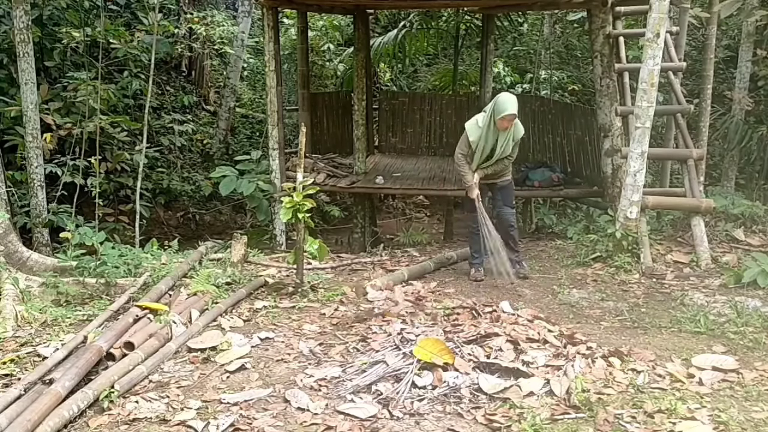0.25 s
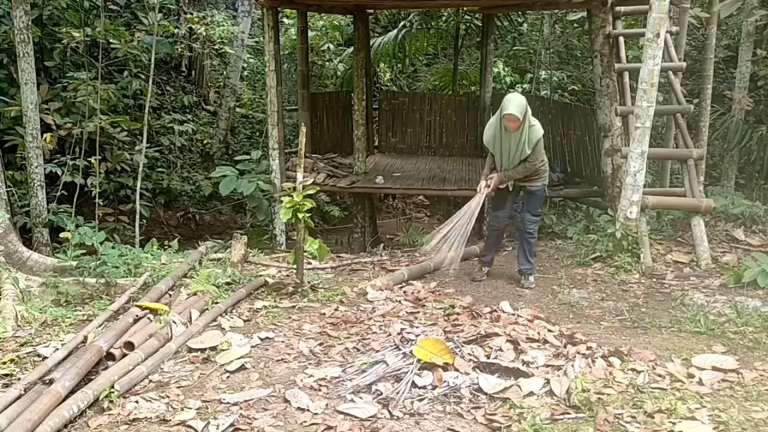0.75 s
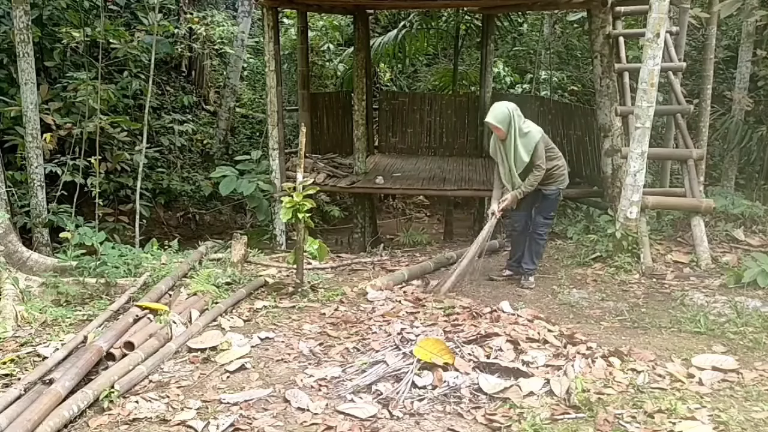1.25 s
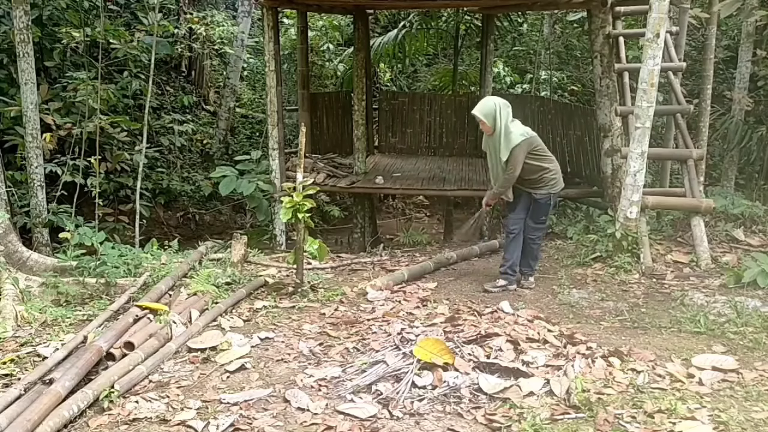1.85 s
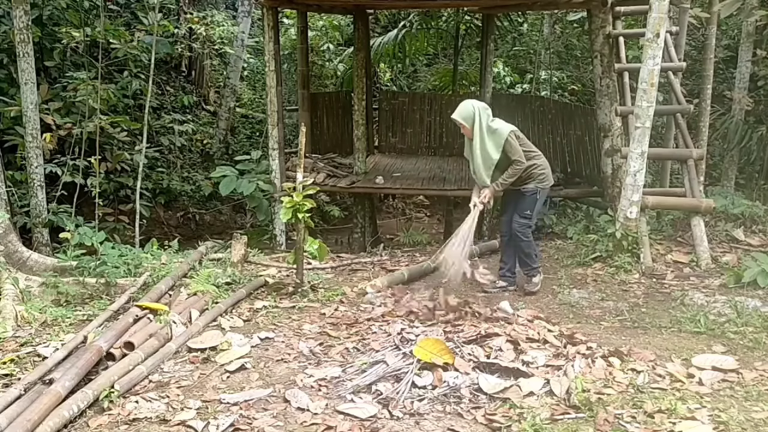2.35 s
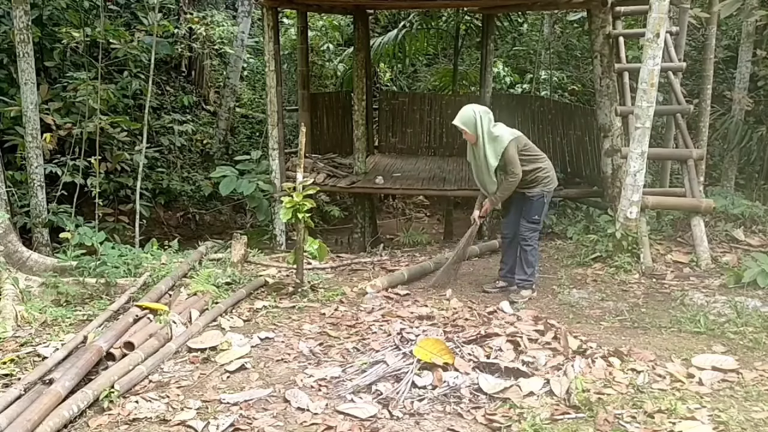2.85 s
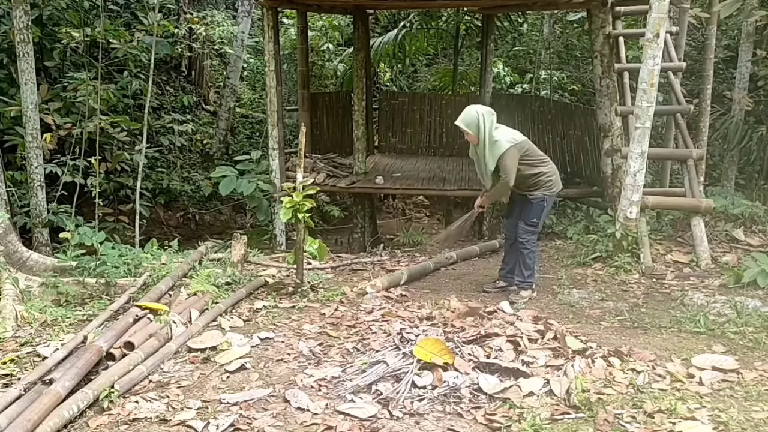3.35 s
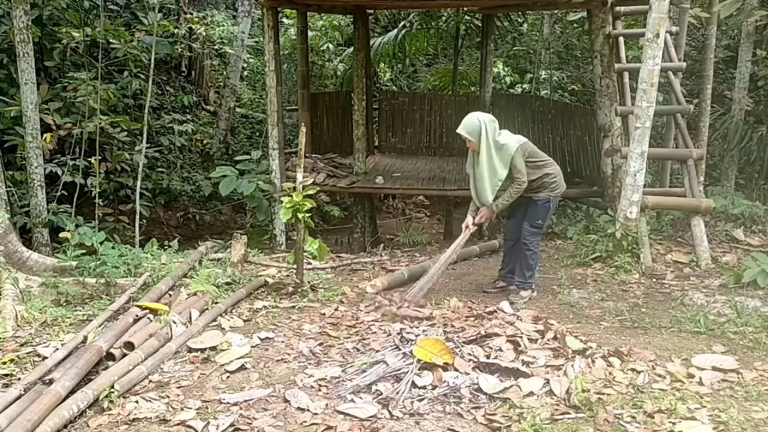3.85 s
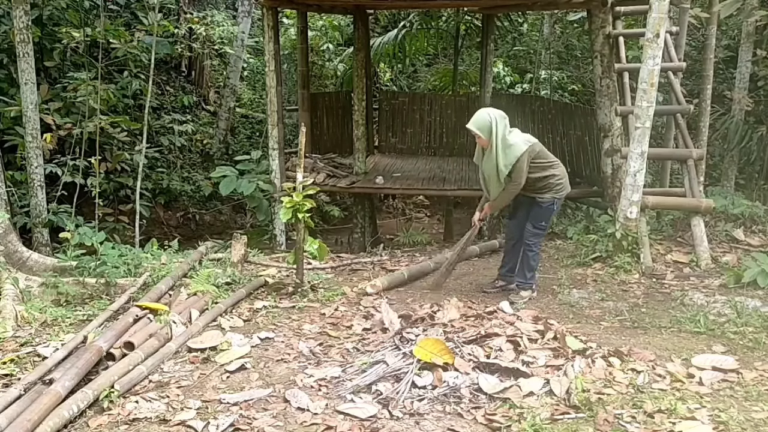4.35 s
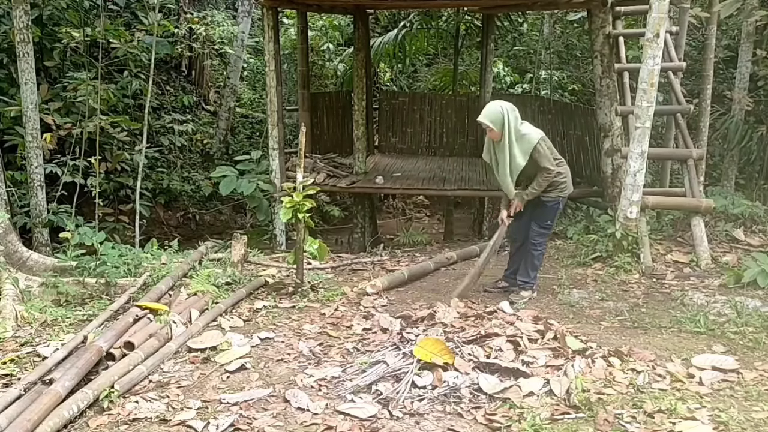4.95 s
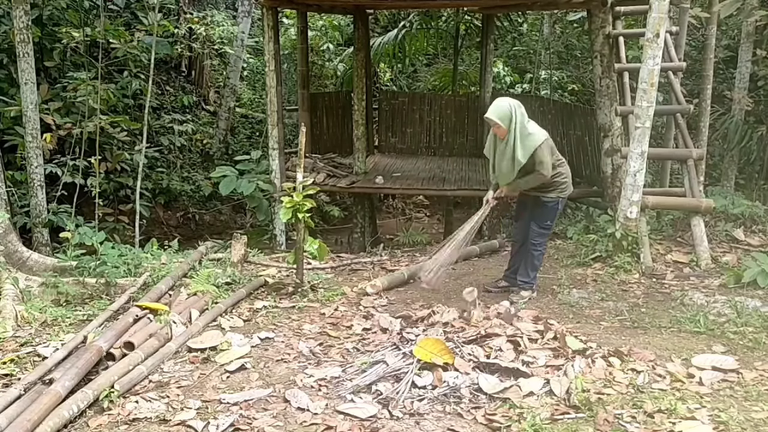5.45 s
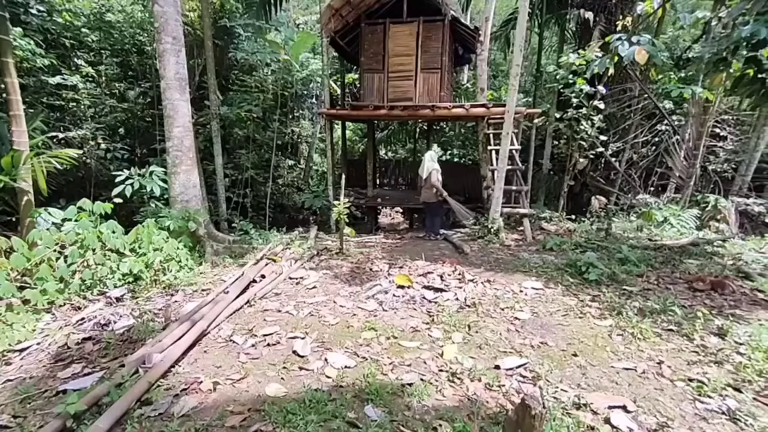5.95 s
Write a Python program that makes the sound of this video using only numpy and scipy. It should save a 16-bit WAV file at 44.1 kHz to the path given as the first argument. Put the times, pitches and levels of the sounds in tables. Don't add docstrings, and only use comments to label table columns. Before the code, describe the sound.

A stick broom sweeps dry leaves over bare dirt in steady crackling, hissing strokes, with twig snaps, faint insects and a soft forest hush.

```python
import sys
import numpy as np
from scipy import signal
from scipy.io import wavfile
from scipy.ndimage import uniform_filter1d

SR = 44100
rng = np.random.default_rng(int(sys.argv[2]) if len(sys.argv) > 2 else 0)


def convert_level_to_amplitude(level_db):
    exponent = np.asarray(level_db, float) / 20
    return 10 ** exponent


def master_out(mix):
    frames = np.transpose(np.atleast_2d(mix))
    ceiling = np.clip(frames, -1, 1)
    pcm = np.round(ceiling * 32767).astype(np.int16)
    wavfile.write(sys.argv[1], SR, pcm)


N = 273861

# start_s (tips touch down), gather_s, push_s, crackle_db, hiss_db (re crackle)
STROKES = [
    (-.15, .14, .18, -30, 2),
    (0.482, .15, .16, -36.5, 4),
    (1.271, 0.16, 0.15, -29, 1),
    (2.122, 0.18, 0.15, -27, 0.5),
    (2.99, 0.14, 0.17, -31.5, 2.5),
    (3.702, 0.13, 0.27, -28, 2),
    (4.539, 0.16, 0.061, -32, 1.5),
    (5.061, 0.17, 0.11, -29, -2.5),
    (5.854, 0.11, .11, -28.5, -2),
]
LAYER_HZ = (400, 1600, 4000, 10000)
LAYER_DB = (-4.5, -3, 0, 0)
TOUCH_DB = (-22.5, -20, -12.5, -8.5)
PUSH_DB_PER_S = (18, -1, -5, -26.5)
LIFT_DB_PER_S = (-160, -170, -150, -83)
SETTLE_DB = (-11, -8.5, -12, -11.5)
SETTLE_DB_PER_S = (-10, -13, -23, -19)
# centre_s, level_db, length_s, heavy_db (per layer toward the bass)
STRAYS = [(0.097, -32.5, 0.016, -3.5), (0.379, -41.5, 0.046, 0.5), (0.682, -43, 0.029, 2.5),
          (0.974, -42.5, 0.041, 0), (1.15, -54.5, 0.034, 10.5), (1.294, -46, 0.011, -7),
          (1.558, -38.5, 0.017, 3), (2.135, -60, 0.014, -3), (3.015, -39, 0.024, -3.5),
          (5.09, -43.5, .025, -6), (0.858, -43, .04, -5.5), (6.165, -44.5, 0.012, 2),
          (1.806, -42.5, 0.017, 2), (2.332, -30, 0.058, 2), (2.617, -38, 0.017, 4), (2.867, -49, 0.017, 4),
          (3.21, -43, 0.026, -1), (3.87, -40, .02, 2), (4.07, -39.5, 0.034, 5.5), (4.26, -49.5, 0.022, 0),
          (4.294, -48, 0.022, 5.5), (4.459, -45.5, .03, -0.5), (4.764, -43, 0.013, 5.5),
          (4.824, -36.5, 0.018, -0.5), (5.02, -41.5, .012, 4.5), (5.246, -36.5, 0.02, 1.5),
          (5.379, -47.5, 0.07, 8.5), (5.875, -33.5, 0.01, 2), (6.026, -34, 0.055, 2.5)]
# pitch_hz, level_db (per Hz)
BROOM_SPECTRUM = [(59, -53), (100, -38), (210, -6.5), (302, -19.5), (452, -6.5), (676, -16.5), (854, -11),
                  (1030, -10), (2000, -2), (2990, -3), (3700, 1.5), (5650, -4), (8110, -17), (14700, -13),
                  (16000, -19.5)]
# pitch_hz, correlation (-1 to 1)
BROOM_LIKENESS = [(60, .2), (130, 0.54), (290, 1), (640, 0.86), (1410, 0.63), (3100, .6), (6820, 0.44),
                  (15000, 0.4)]
# delay_s, wander_s (as the broom moves), share (gain)
ECHOES = [(.0011, 0.00026, 0.26), (.0027, 0.00013, 0.39), (.0063, 0.00024, .3)]
# pitch_hz, level_db (per Hz)
FOREST_SPECTRUM = [(41, -46), (70, -20), (132, -28), (441, -7.5), (1410, -7), (1980, -5), (2910, -1.5),
                   (4280, -1.5), (6160, -19), (6900, -3.5), (8090, -86.5), (11900, 7), (13300, -22),
                   (14900, -31), (16000, -71)]
# pitch_hz, correlation (-1 to 1)
FOREST_LIKENESS = [(60, 0.36), (180, 0.67), (550, 0.19), (1650, -0.19), (4970, -0.1), (15000, -0.22)]
# time_s, low_pitch_hz, low_level_db, high_level_db
INSECTS = [
    (0, 4393, -43, -44.5),
    (1.3, 4363, -47.5, -51.5),
    (2, 4390, -75.5, -51.5),
    (2.9, 4305, -48, -50),
    (3.6, 4300, -51.5, -52),
    (4.4, 4260, -52.5, -55),
    (5, 4190, -48.5, -58.5),
    (6.2, 4182, -56.5, -60.5),
]
# time_s, level_db
BREEZE = [(0, -68), (3.3, -70), (4.5, -65.5), (5.5, -73.5), (6.2, -73.5)]
# centre_s, level_db
GUSTS = [(.21, -72), (.67, -61.5), (.94, -62), (1.38, -58.5), (1.54, -57), (1.86, -68), (2.59, -64),
         (3.09, -68), (3.25, -58), (3.76, -55), (3.94, -52.5), (4.21, -67), (4.46, -62), (5.58, -66),
         (5.85, -64.5)]
# start_s, peak_db, pitch_hz, knock_db (re peak)
SNAPS = [(0.601, -25, 4240, -26), (0.968, -32.5, 4330, -33), (1.149, -37.5, 4200, -11),
         (1.276, -37, 4177, -29), (1.569, -23, 3850, -31), (1.798, -31, 4340, -26),
         (2.6095, -28, 2880, -33), (2.6154, -17.5, 2790, -17), (2.856, -36, 4330, 2),
         (2.996, -38, 4187, -38), (3.769, -35, 3580, -41), (3.876, -21, 2046, -28),
         (4.077, -19.5, 2380, -11.5), (4.289, -28, 2314, -27), (4.822, -28, 2010, -42),
         (5.021, -29, 4080, -21), (5.067, -42, 3595, -40), (5.866, -19.5, 3560, -21)]
# pitch_hz, step_db (re masking level)
COARSENESS = [(100, -14), (1000, -4), (2500, .5), (4500, 3.5), (6000, 6), (7000, 7), (8500, 6.5),
              (12000, 5.5), (15000, 4.5)]
# centre_hz, width_hz, extra_step_db
STARVED = [(7350, 80, 11), (8150, 260, 11), (12100, 280, 10)]
# time_s, gain (0 to 1)
FADE = [(0, 1), (6.105, 1), (6.13, .5), (6.186, .22), (6.192, 0), (6.3, 0)]


def rms_one(x):
    return x / np.sqrt(np.mean(x ** 2) + 1e-20)


def in_time(rows):
    s, *columns = np.transpose(rows)
    return [np.interp(np.arange(N) / SR, s, c) for c in columns]


def at_hz(points, hz):
    table_hz, value = np.transpose(points)
    return np.interp(np.log(hz), np.log(table_hz), value)


def bandpass(x, low_hz, high_hz):
    return signal.sosfilt(signal.butter(2, [low_hz, high_hz], "band", fs=SR, output="sos"), x)


def drift(rate_hz):
    r = np.exp(-80 * np.pi * rate_hz / SR)
    slow = signal.lfilter([1], [1, -2 * r, r * r], rng.standard_normal(N // 40 + 1002))
    slow = rms_one(slow[1000:])
    return np.interp(np.arange(N) / 40, np.arange(len(slow)), slow)


def bumps(t, at_s, db, length_s):
    return (convert_level_to_amplitude(2 * db) * np.exp(-((t[:, None] - at_s) / length_s) ** 2)).sum(axis=-1)


def bands(source, spectrum, likeness, low_hz, shape_db):
    out = 0
    edges = low_hz * 2 ** (np.arange(23) / 3)
    for k, (low, high) in enumerate(zip(edges, edges[1:])):
        mid, side = bandpass(source[k % 2], low, high)
        hz = np.sqrt(low * high)
        alike = np.clip(at_hz(likeness, hz), -.95, .95)
        gain = convert_level_to_amplitude(at_hz(spectrum, hz) + shape_db(hz))
        spread = np.sqrt(1 - alike) * side * [[1], [-1]]
        out = out + gain * (np.sqrt(1 + alike) * mid + spread)
    return out


def grains(per_s, spread_db, smooth, count):
    born = rng.random((count, N)) < per_s / SR
    rise = np.minimum(rng.exponential(1, (count, N)), 4)
    sizes = convert_level_to_amplitude(spread_db * rise) * rng.choice([-1, 1], (count, N))
    return rms_one(rms_one(born * sizes) + smooth * rng.standard_normal((count, N)))


def sweeping():
    touch_db_per_s = 620
    t = np.arange(0, N, 64) / SR
    per_layer = (LAYER_DB, TOUCH_DB, PUSH_DB_PER_S, LIFT_DB_PER_S, SETTLE_DB, SETTLE_DB_PER_S)
    own, touch, push, lift, settle, settle_rate = (np.array(v)[:, None] for v in per_layer)
    tips_only = np.eye(4)[:, 3:]
    power = 1e-12
    for start_s, gather_s, push_s, crackle_db, hiss_db in STROKES:
        since = t - start_s
        after = np.maximum(since - gather_s - push_s, 0)
        held = crackle_db + own + hiss_db * tips_only
        held = held + touch_db_per_s * np.minimum(since, 0)
        held = held + touch * np.clip(1 - since / gather_s, 0, 1)
        held = held + push * np.clip(since - gather_s, 0, push_s)
        lifted = convert_level_to_amplitude(2 * lift * after)
        settling = convert_level_to_amplitude(2 * (settle + settle_rate * after))
        power = power + convert_level_to_amplitude(2 * held) * (lifted + settling)
    s, db, length_s, heavy_db = np.transpose(STRAYS)
    power = power + [bumps(t, s, db + heavy_db * steps, length_s) for steps in (2, 1, 0, -2)]
    return np.array([np.interp(np.arange(N) / SR, t, 10 * np.log10(p)) for p in power])


def broom():
    clump_db, patch_db = 0.79, 1.5
    layers = sweeping()
    clumps = clump_db * (.3 * drift(16) + drift(70))

    def shape_db(hz):
        place = np.interp(np.log(hz), np.log(LAYER_HZ), np.arange(4))
        weights = np.maximum(1 - abs(place - np.arange(4)), 0)
        return weights @ layers + clumps + patch_db * drift(19.4)

    rustle = grains(per_s=3500, spread_db=5, smooth=.6, count=4).reshape(2, 2, N)
    return convert_level_to_amplitude(5.0) * bands(rustle, BROOM_SPECTRUM, BROOM_LIKENESS, 110, shape_db)


def near_echoes(x):
    out, n = x.copy(), np.arange(N)
    for delay_s, wander_s, share in ECHOES:
        path_s = delay_s + wander_s * drift(1.5)
        left, right = [np.interp(n - SR * path_s * ear, n, side) for ear, side in zip((1, 1.04), x)]
        out = out + share * np.array([left, right])
    return out


def forest():
    together = drift(7.5)

    def shape_db(hz):
        return together + 1.5 * drift(12)

    noise = rng.standard_normal((2, 2, N))
    hush = bands(noise, FOREST_SPECTRUM, FOREST_LIKENESS, 118.1, shape_db)
    return convert_level_to_amplitude(-41.5) * rms_one(hush)


def singer(hz, level_db, width_hz, throb_hz, depth):
    t = np.arange(N) / SR
    carrier = np.exp(2j * np.pi * np.cumsum(hz + 0 * t) / SR)
    waver = np.array([drift(width_hz) + 1j * drift(width_hz) for ear in range(2)])
    throb = 1 + depth * np.sin(2 * np.pi * throb_hz * t + 1.5 * drift(3))
    return convert_level_to_amplitude(level_db) * rms_one((carrier * waver).real * throb)


def insects():
    low_hz, low_db, high_db = in_time(INSECTS)
    low = singer(low_hz, low_db, width_hz=50, throb_hz=62, depth=.3)
    return low + singer(5445, high_db, width_hz=38, throb_hz=37, depth=.3)


def wind():
    gusts = bandpass(rng.standard_normal((2, N)), 15, 48)
    rumble = bandpass(rng.standard_normal((2, N)), 45, 110)
    t = np.arange(0, N, 256) / SR
    gust_s = 0.033
    puffs = np.interp(np.arange(N) / SR, t, bumps(t, *np.transpose(GUSTS), gust_s))
    force = np.sqrt(convert_level_to_amplitude(2 * in_time(BREEZE)[0]) + puffs)
    port_gain = convert_level_to_amplitude(np.array([[0.0], [3.5]]))
    return force * port_gain * rms_one(gusts) + convert_level_to_amplitude(-74.5 + 4.0 * drift(5.1)) * rms_one(rumble)


def ring(clicks, hz, t60):
    r, w = convert_level_to_amplitude(-60 / (t60 * SR)), 2 * np.pi * hz / SR
    return signal.lfilter([0, np.sin(w)], [1, -2 * r * np.cos(w), r * r], clicks + 1e-18)


def snaps():
    out = np.zeros(N)
    click = np.zeros(2000)
    click[[0, 60, 190]] = 1, -.4, .2
    for s, db, hz, knock_db in SNAPS:
        crack = 1.3 * ring(click, hz, 0.004)
        crack = crack + 0.34 * ring(click, hz * 0.81, 0.0036) + 0.33 * ring(click, hz * 1.9, 0.0033)
        knock = convert_level_to_amplitude(knock_db) * (ring(click, 1120, 0.01) + 0.47 * ring(click, 570, 0.016))
        at = round(s * SR)
        out[at:at + 2000] += convert_level_to_amplitude(db) * (crack + knock)
    return signal.sosfilt(signal.butter(2, 350, "high", fs=SR, output="sos"), out)


def slow_whim(shape, frames):
    return rms_one(uniform_filter1d(rng.standard_normal(shape), size=frames, axis=1))


def camera_rounding(x):
    hop, spread_hz, whim_db, quiet_db, full_top_hz = 1024, 900, 5.0, -65, 15600
    n, k = np.arange(2 * hop), np.arange(hop)
    window = np.sin(np.pi * (n + .5) / (2 * hop))
    cosines = np.cos(np.pi / hop * np.outer(k + .5, n + .5 + hop / 2))
    basis = window * cosines * np.sqrt(2 / hop)
    mid_side = np.array([x[0] + x[1], x[0] - x[1]]) / 2
    blocks = np.pad(mid_side, [(0, 0), (hop, 2 * hop - N % hop)]).reshape(2, -1, hop)
    lines = np.concatenate([blocks[:, :-1], blocks[:, 1:]], axis=2) @ basis.T
    hz = (k + .5) * SR / 2 / hop
    power = uniform_filter1d((lines ** 2).mean(axis=0), int(spread_hz / hz[0] / 2), axis=1)
    whim = slow_whim((2, len(power), hop // 5 + 1), 5)[..., k // 5]
    step_db = at_hz(COARSENESS, hz) + whim_db * (1 + .5 * (hz > 5900)) * whim
    thrift = slow_whim((4, len(power), 1), 4)
    busy = np.log(power[:, -hop // 2:].mean(axis=1, keepdims=True) + 1e-12)
    busy = rms_one(busy - busy.mean())
    top_hz = full_top_hz - 550 * np.clip(.7 * thrift[3] + .3 - .8 * busy, 0, 2)
    for (centre_hz, width_hz, extra_db), mood in zip(STARVED, thrift):
        bell = np.exp(-((hz - centre_hz) / width_hz) ** 2)
        step_db = step_db + extra_db * (1 + .5 * mood - .3 * busy) * bell
    quiet = convert_level_to_amplitude(2 * quiet_db) * (hz / full_top_hz) ** 6
    step = np.sqrt(power + quiet) * convert_level_to_amplitude(step_db) + 1e-9
    lines = np.sign(lines) * np.floor(abs(lines) / step + 0.3) * step * (hz < top_hz)
    frames = lines @ basis
    mid, side = (frames[:, :-1, hop:] + frames[:, 1:, :hop]).reshape(2, -1)[:, :N]
    return np.array([mid + side, mid - side])


def scene():
    left, right = near_echoes(broom()) + snaps()
    return np.array([np.roll(left, 1), right]) + forest() + insects() + wind()


def roll_off(x):
    return signal.sosfilt(signal.butter(12, 16330, fs=SR, output="sos"), x)


def record(dry):
    mix = camera_rounding(dry) * in_time(FADE)[0]
    return roll_off(mix)


dry = scene()
out = record(dry)
master_out(out)
```